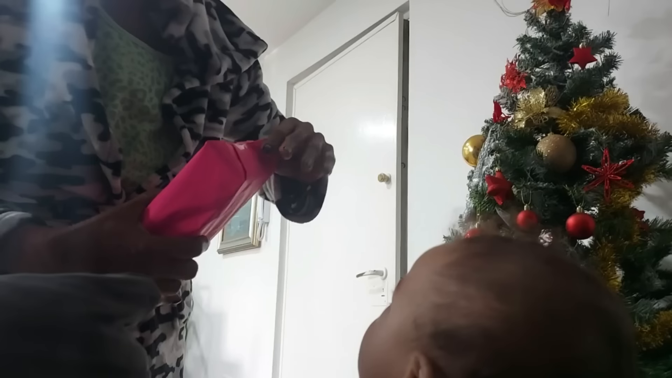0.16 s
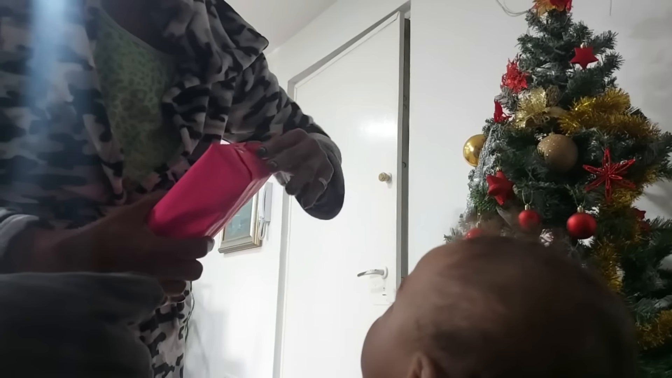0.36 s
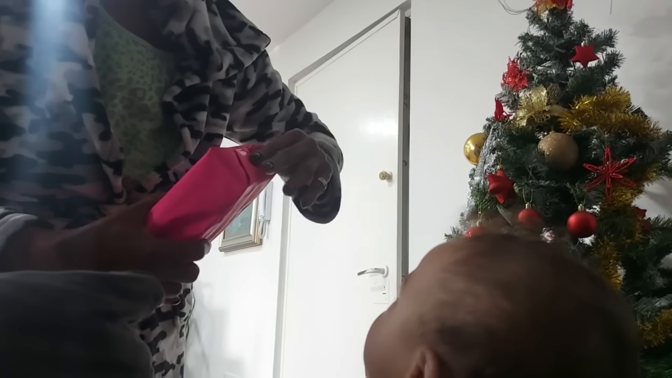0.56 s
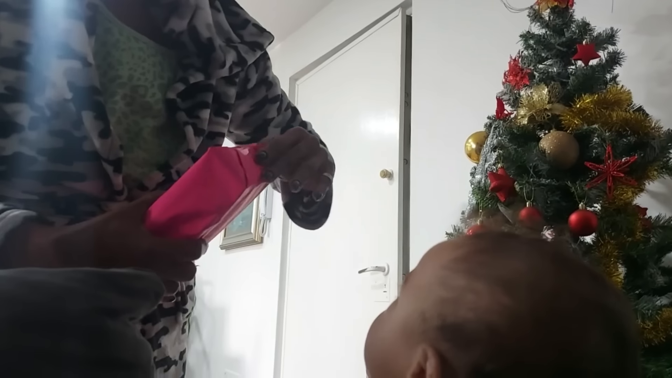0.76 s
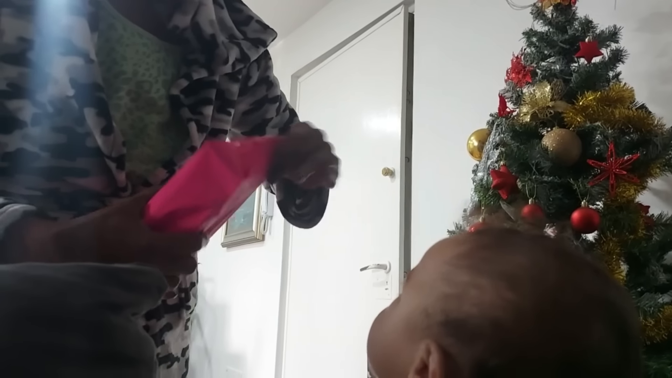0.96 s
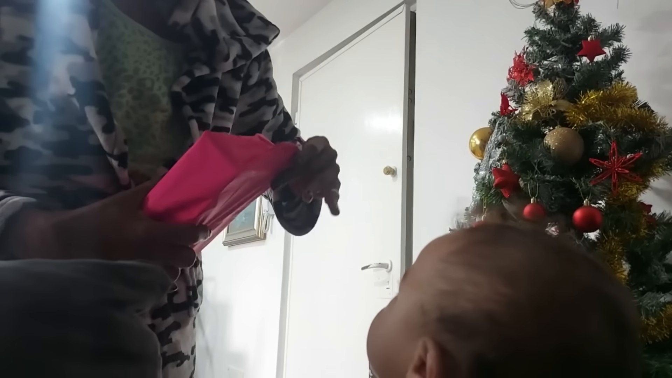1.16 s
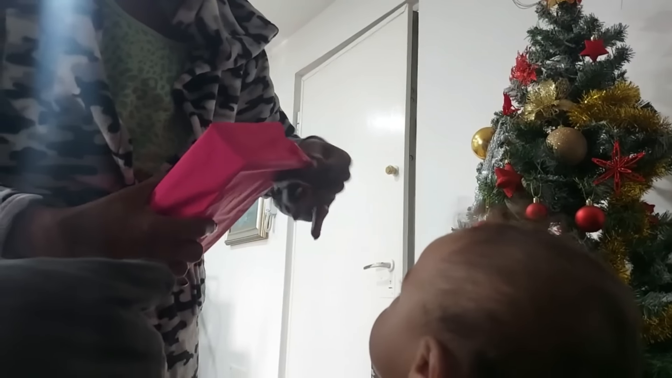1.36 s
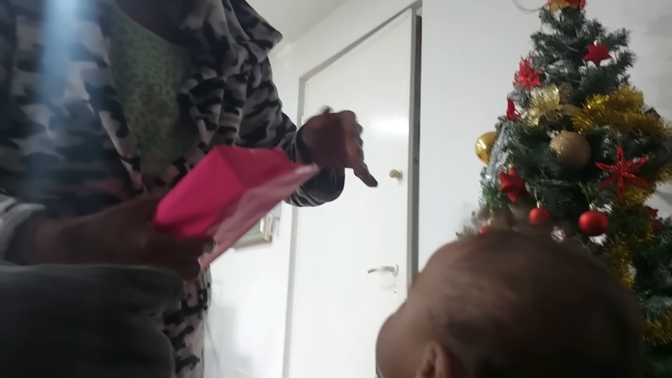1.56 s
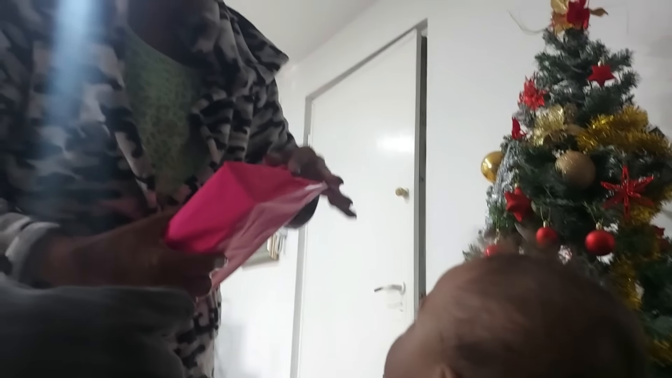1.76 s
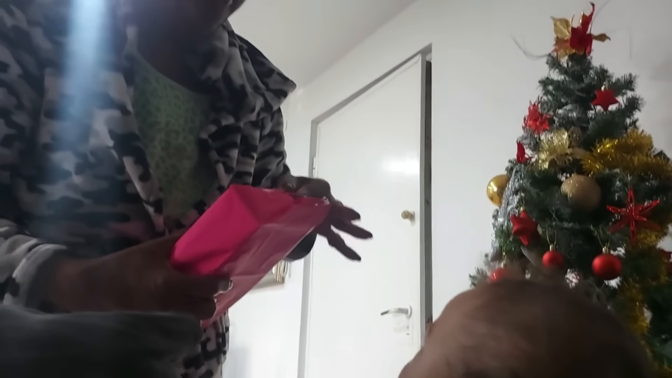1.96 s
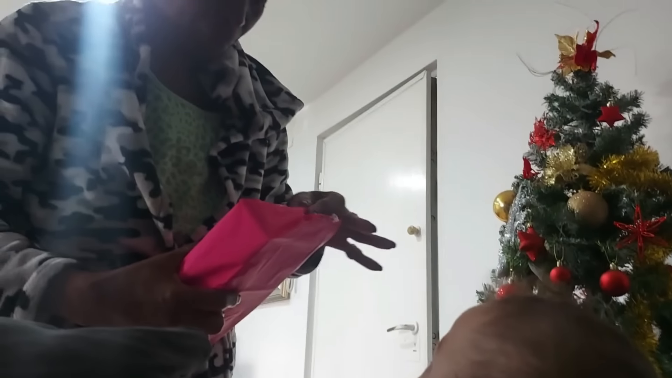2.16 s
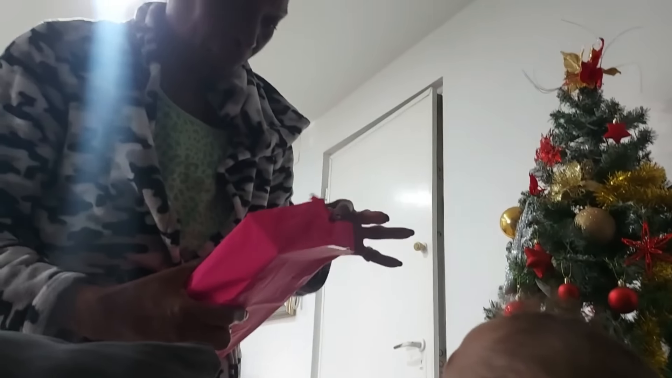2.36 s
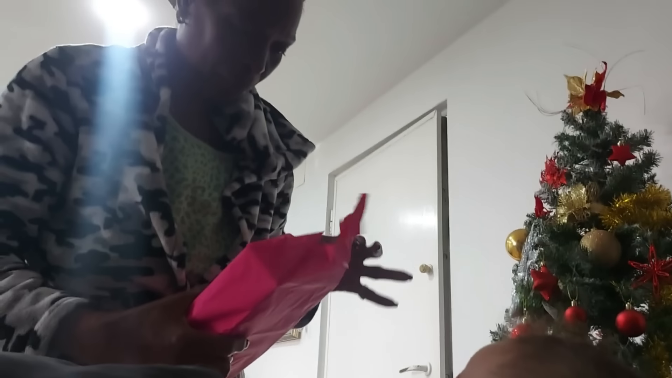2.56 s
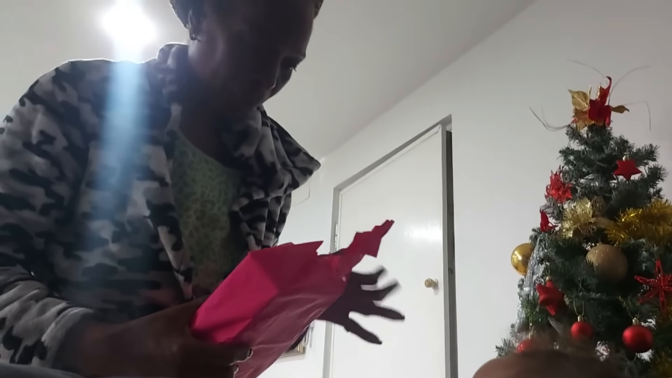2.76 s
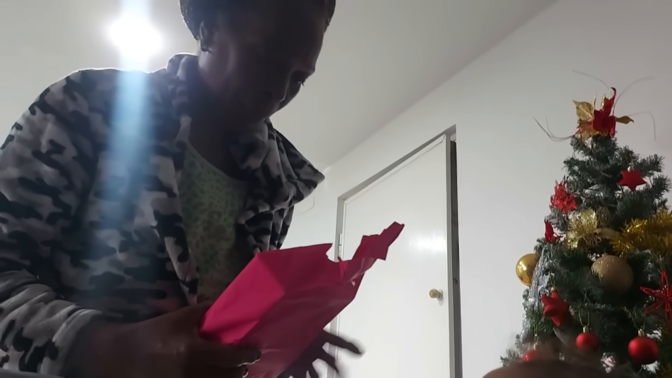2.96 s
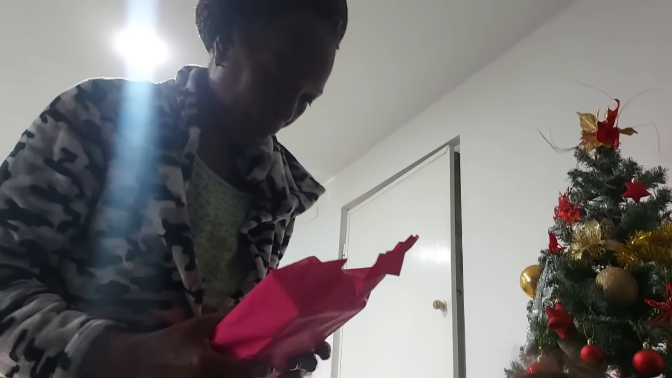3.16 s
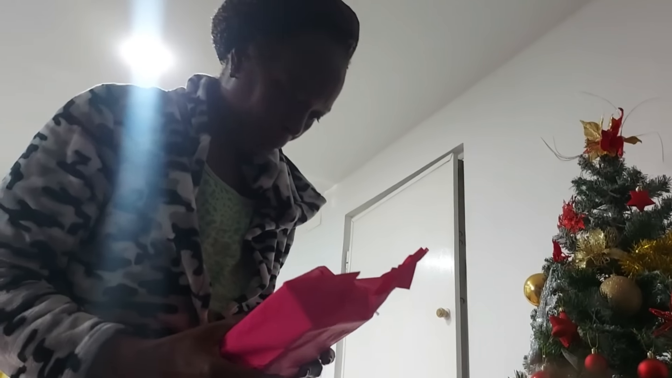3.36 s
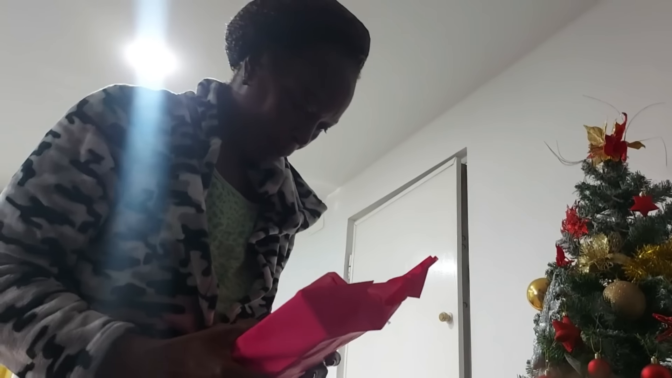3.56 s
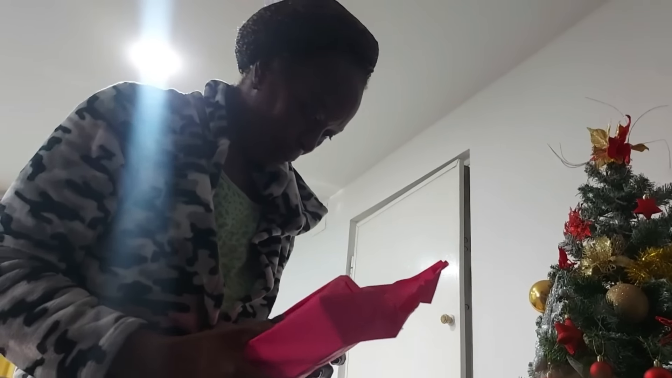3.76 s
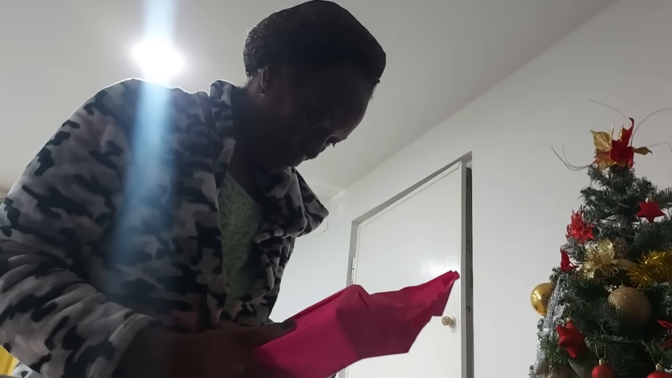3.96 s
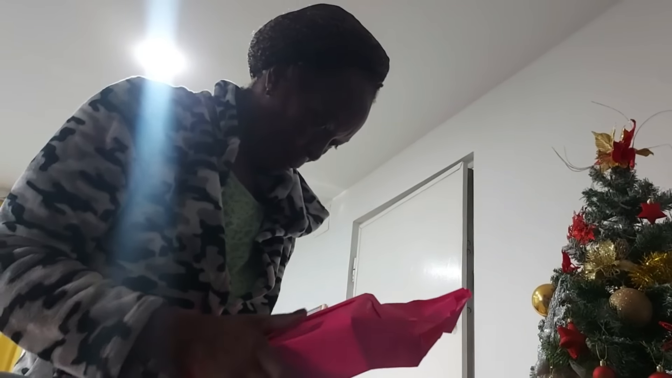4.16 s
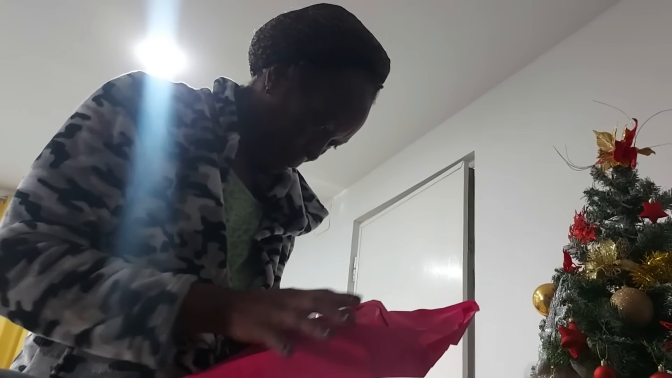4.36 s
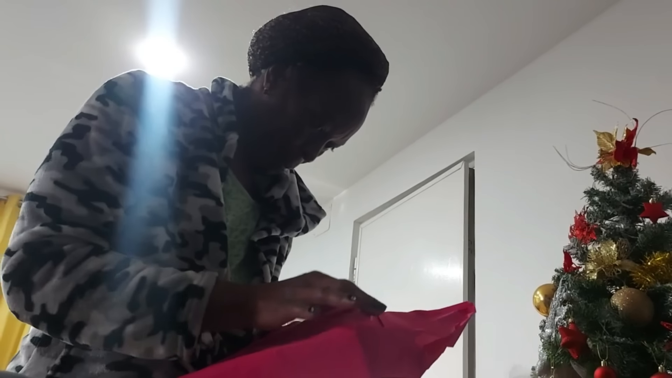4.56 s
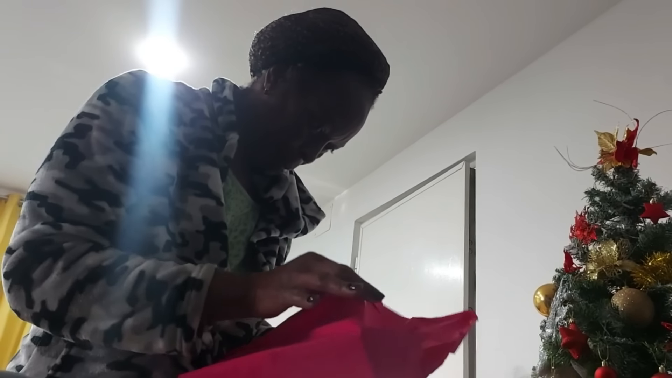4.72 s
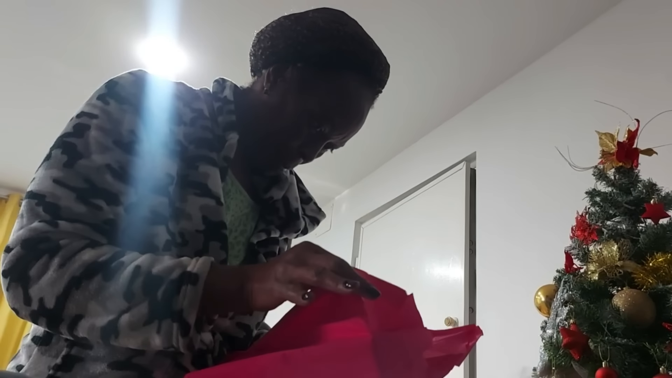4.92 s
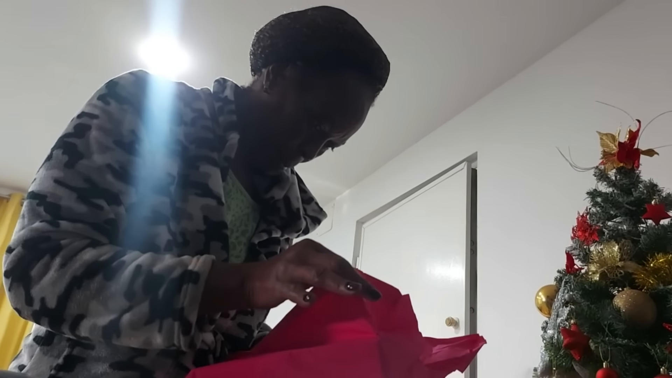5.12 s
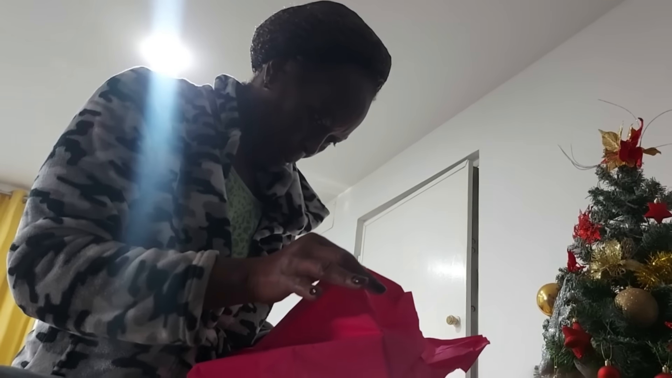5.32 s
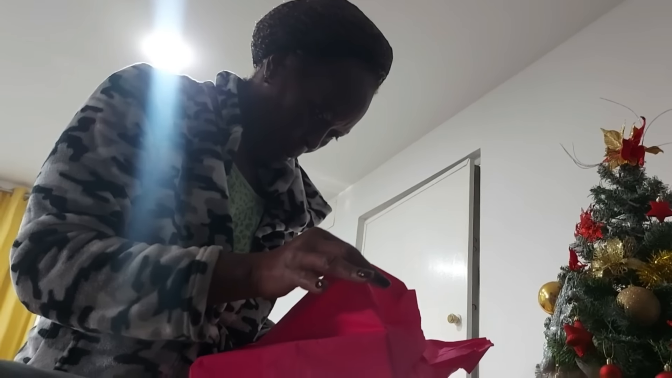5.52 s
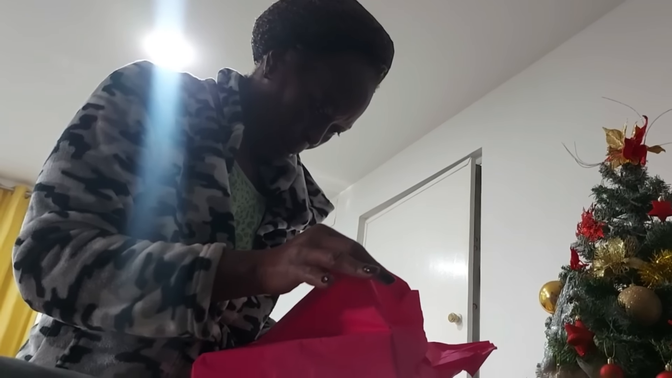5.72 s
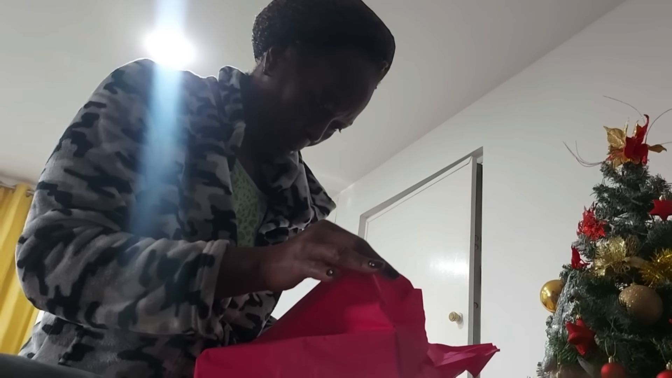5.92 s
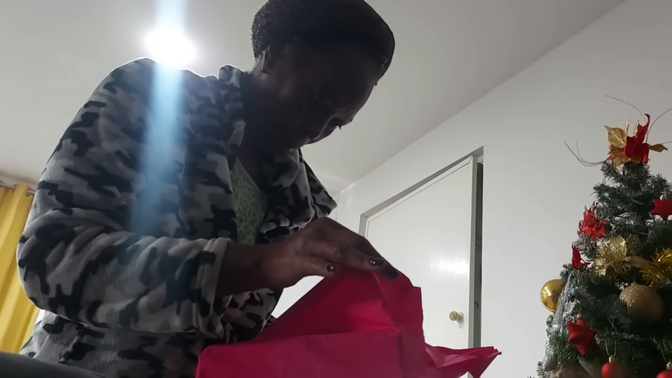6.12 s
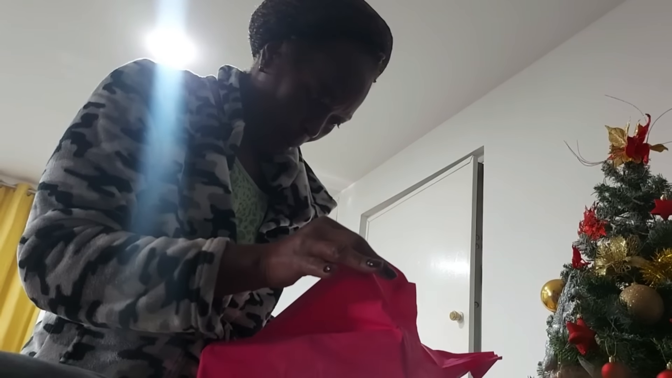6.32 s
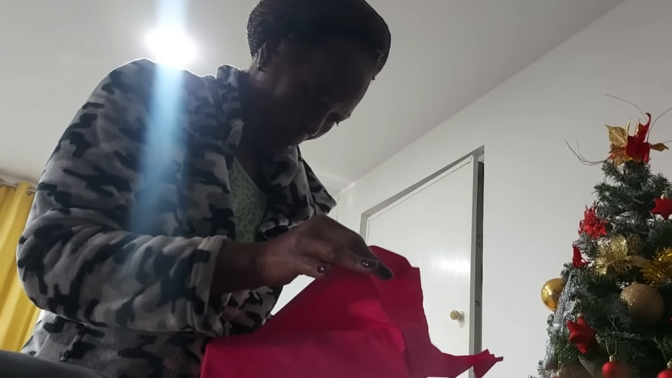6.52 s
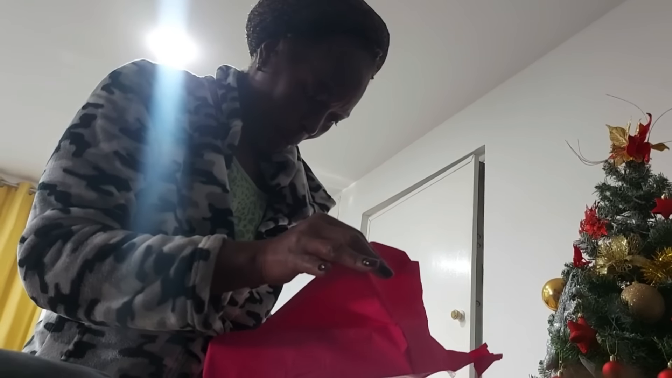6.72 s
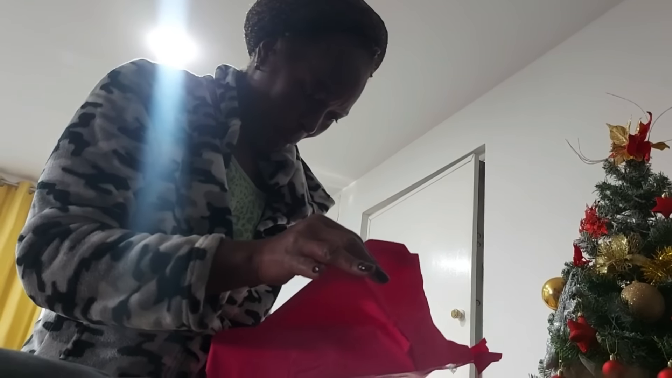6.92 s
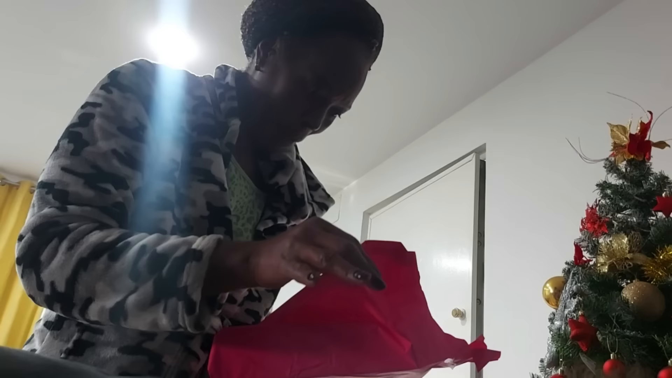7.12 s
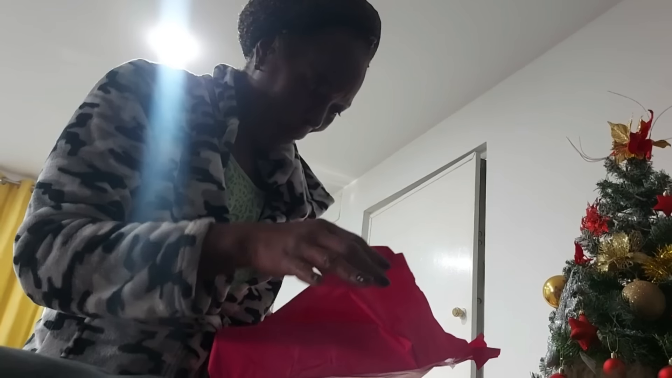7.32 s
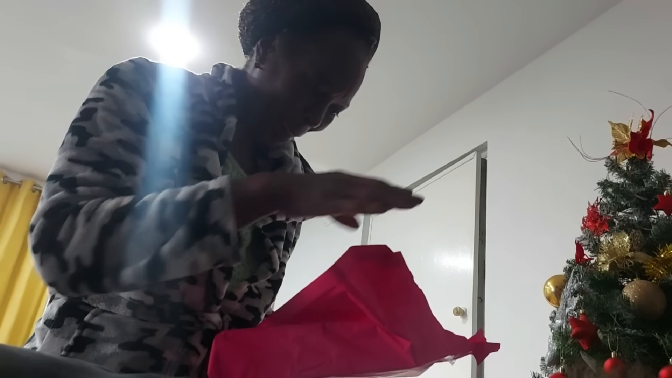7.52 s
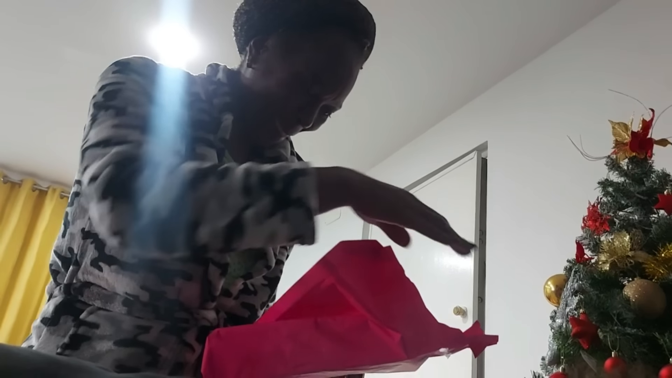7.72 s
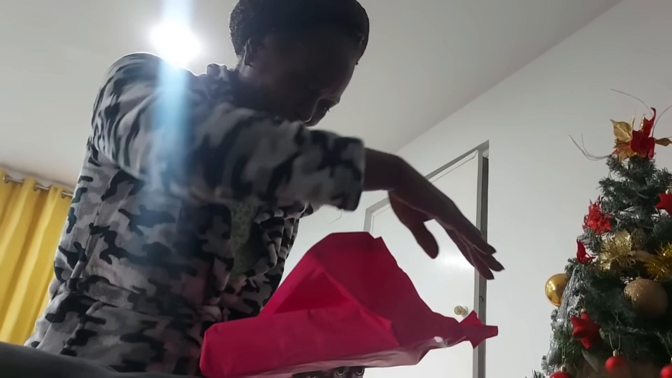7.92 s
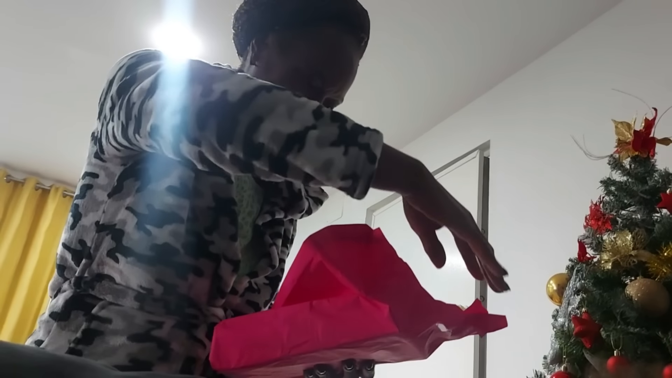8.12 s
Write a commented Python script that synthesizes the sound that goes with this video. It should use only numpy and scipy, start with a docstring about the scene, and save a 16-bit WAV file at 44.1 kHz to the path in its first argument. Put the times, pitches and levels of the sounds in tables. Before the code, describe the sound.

Hands open a paper-wrapped present close to the microphone in a quiet, slightly echoing living room. The paper crinkles in irregular bursts, with creases snapping sharply. A quick rip and a loud crunch come about a third of the way in. The rustling then turns softer and more broken, with short lulls and scattered crackles. Dull little bumps on the parcel come now and then over a faint low hum.

```python
"""In a bare, slightly echoing living room, a paper-wrapped present is opened by hand.
Each move of the hands bends the sheet: tiny facets buckle in a crackle and the paper slides, then settles.
Creases snap through with single sharp cracks, and one fold rips loose in a quick run of plucks.
Hands bump the parcel now and then with a damped thud, over a quiet room tone."""
import sys
import numpy as np
from scipy import signal
from scipy.fft import rfft, irfft
from scipy.io import wavfile
from scipy.ndimage import uniform_filter1d

SR = 44100
rng = np.random.default_rng(int(sys.argv[2]) if len(sys.argv) > 2 else 0)


def wrap_up_sound(samples):
    """Save the sound to the file named by the first command line argument, as 16-bit audio."""
    columns = np.atleast_2d(samples).T
    # keep every value between -1 and 1, then stretch to whole-number steps
    tamed = np.clip(columns, -1, 1)
    steps = np.round(tamed * 32767).astype(np.int16)
    wavfile.write(sys.argv[1], SR, steps)


N = 360826

# spectrum of the room's rumble and hiss: frequency_hz, density_db
ROOM_TONE_SPECTRUM = [(25, -18), (55, -7.5), (110, 1.5), (200, -13), (350, -6.5), (600, -20), (1200, -19.5),
                      (4000, -34), (8000, -23.5)]
# reverberation time of the room: frequency_hz, t60_s
REVERB_TIMES = [(120, 1.5), (380, 1.1), (600, 0.58), (7000, 0.43), (14000, 0.31)]
# likeness of the two channels in a diffuse field: frequency_hz, correlation
COHERENCE = [(350, 0.85), (700, 0.34), (1400, 0.11), (3000, 0.14)]
# soft contacts of hand and parcel: start_s, peak_db, pitch_hz
HAND_BUMPS = [(.342, -28.5, 690), (1.012, -39.5, 68), (2.47, -28, 346), (2.672, -33.5, 165),
              (2.697, -26.5, 336), (3.168, -40, 340), (3.605, -43, 325), (4.95, -40.5, 388),
              (5.135, -45, 360), (6.512, -40, 262), (6.889, -37, 128), (7.025, -36.5, 331),
              (7.865, -46.5, 196), (7.902, -35, 123), (7.925, -39.5, 270)]
# pulls and folds of the sheet: start_s, pull_s, settle_s, effort_db, tautness (slack < 0 < crisp)
HAND_MOVES = [(0.0, 0.0011, 0.028, -35, 1.5), (0.249, 0.099, 0.047, -38.5, 1),
              (0.488, 0.015, 0.44, -48, 1.13), (0.632, 0.17, 0.082, -38.5, 0.5),
              (1.009, 0.0079, 0.28, -33, 0.23), (1.2, 0.16, 0.16, -40.5, -0.5),
              (1.42, 0.063, 0.044, -40.5, 0.5), (1.784, 0.014, 1, -61.5, 0.5),
              (2.141, 0.098, 0.031, -40, 0.16), (2.254, 0.13, 0.33, -32.5, 0.1),
              (2.633, 0.046, 0.073, -24, -0.17), (2.75, 0.0306, 0.066, -36.5, 1),
              (3.029, 0.16, 0.032, -50.5, 1), (3.233, 0.017, 0.31, -44.5, -0.5),
              (3.449, 0.17, 0.22, -42, -2), (3.735, 0.016, 0.51, -43.5, 0.07), (4.19, 0.026, 0.1, -59, 3),
              (4.552, 0.047, 0.22, -58.5, 2.5), (4.619, 0.029, 0.18, -41.5, 1.46),
              (4.709, 0.088, 0.073, -40.5, 0.1), (4.849, 0.061, 0.24, -49, -1.6),
              (5.85, 0.26, 0.14, -62.5, -3.5), (6.292, 0.071, 0.19, -50.5, -1),
              (6.47, 0.047, 0.055, -48, -4), (6.728, 0.044, 0.16, -47, -2.5),
              (6.882, 0.025, 0.015, -32, -1), (7.02, 0.063, 0.18, -52, -1),
              (7.209, 0.15, 0.075, -57.5, 1.5)]
# spectrum of the crumpling sheet: frequency_hz, density_db
SHEET_SPECTRUM = [(200, -13.5), (360, 2), (500, -8), (790, 2.5), (1150, -3), (2300, 0), (4000, 0),
                  (7300, -3.5), (9500, -9.5), (12000, -5), (16000, -17.5)]
# spectrum of one snapping crease: frequency_hz, density_db
CREASE_SPECTRUM = [(350, -18.5), (800, -8), (1900, -6.5), (2650, 2.5), (3400, -2.5), (4500, 0.5),
                   (7500, -1), (9300, -9), (12000, -2), (16000, -16.5)]
# creases that buckle, levels relative to one another: start_s, level_db, pitch_hz, treble_db
CREASE_SNAPS = [(.049, -22, 4740, -5.5), (0.218, -35.5, 4240, -12), (.249, -26.5, 4540, 2),
                (.32, -24.5, 4300, -20.5), (0.507, -28.5, 4540, 29.5), (.651, -22, 6300, 6.5),
                (0.735, -25.5, 3800, 12.5), (.790, -20.5, 5310, -5), (.898, -27.5, 6300, 10),
                (1.014, -10.5, 3710, 2.5), (1.262, -30.5, 3900, 1), (1.310, -26.5, 6550, 28),
                (1.350, -25.5, 5330, -1.5), (1.438, -28.5, 4970, 3), (1.589, -39, 4200, -2),
                (1.803, -46.5, 4500, 5), (2.045, -42, 4300, -2), (2.138, -30, 4070, 10.5),
                (2.207, -28.5, 2920, 8), (2.426, -11.5, 2720, -6), (2.463, -12, 5560, -4),
                (2.618, -25, 4300, -3), (2.651, -22.5, 7480, 5), (2.659, -23, 4500, 8),
                (2.678, -17, 3000, 10), (2.796, -23.5, 4120, 3), (2.835, -31.5, 2444, -29),
                (3.08, -32.5, 6900, 9), (3.163, -29.5, 4240, 2), (3.243, -35, 5800, -3.5),
                (3.254, -31, 5430, 9), (3.391, -27.5, 4900, -5.5), (3.491, -27, 4900, -14),
                (3.538, -28.5, 4870, -13), (3.599, -30.5, 4500, -5), (3.622, -23, 4900, 4),
                (3.727, -27.5, 4420, 14), (3.749, -25.5, 6810, -4), (3.763, -22.5, 4500, 8),
                (4.036, -38.5, 4420, -9), (4.237, -38, 5670, -8), (4.375, -41, 7500, 0),
                (4.784, -26.5, 7440, 5), (4.795, -27, 2320, -33), (4.952, -38, 1450, -12),
                (5.146, -39, 4530, -9), (5.199, -43.5, 2540, -19), (5.793, -35, 2660, -14.5),
                (6.222, -37, 6640, -1), (6.299, -25.5, 4220, -3), (6.477, -25.5, 3520, -5),
                (6.487, -26, 3800, -5), (6.499, -32, 4000, -23), (6.563, -31.5, 3900, -18),
                (6.603, -27.5, 4250, -9), (6.604, -30, 2740, -17), (6.708, -43, 2800, -33),
                (6.785, -39, 3700, -18), (6.868, -25.5, 2450, -5.5), (6.895, -26, 4500, 0),
                (7.028, -34, 1430, -11), (7.055, -35, 4830, -13), (7.471, -45, 6860, 13),
                (7.657, -54.5, 2700, -10.5)]


def from_db(db):
    """Amplitude ratio of a level in decibels."""
    return 10 ** (np.asarray(db) / 20)


def unit_rms(x):
    """Normalisation to unit mean power."""
    return x / np.sqrt(np.mean(x ** 2) + 1e-20)


def at_hz(points, hz):
    """Interpolation of a table on a log-frequency axis."""
    known_hz, values = np.transpose(points)
    return np.interp(np.log(hz + 1), np.log(known_hz), values)


def drift(per_s):
    """Random modulation: straight lines between Gaussian values."""
    knots = rng.standard_normal(int(N / SR * per_s) + 2)
    return np.interp(np.arange(N) / SR * per_s, np.arange(len(knots)), knots)


def filtered(x, hz, kind, order=2):
    """Butterworth filtering, maximally flat in the passband."""
    return signal.sosfilt(signal.butter(order, hz, kind, fs=SR, output="sos"), x)


def add(out, start_s, sound):
    """Superposition of a stereo sound on the mix."""
    at = int(np.clip(start_s * SR, 0, N - 1))
    out[:, at:at + sound.shape[1]] += sound[:, :N - at]


def diffuse_noise(size, min_correlation=-1):
    """Diffuse-field coherence: the channels agree most in the bass. Returns frequencies and spectra."""
    hz = np.linspace(0, SR / 2, size // 2 + 1)
    correlation = np.clip(at_hz(COHERENCE, hz), min_correlation, 1)
    mid, side = rfft(rng.standard_normal((2, size)))
    return hz, np.sqrt(1 + correlation) * mid + np.sqrt(1 - correlation) * side * [[1], [-1]]


def coloured_noise(spectrum):
    """Spectral shaping of steady diffuse noise, at unit power."""
    hz, noise = diffuse_noise(N)
    return unit_rms(irfft(noise * from_db(at_hz(spectrum, hz))))


def room_tone(level_db=-61.5):
    """Stationary background noise: the low rumble of the house and a faint hiss."""
    return from_db(level_db) * coloured_noise(ROOM_TONE_SPECTRUM)


def reverberation(x, onset_s=0.0036, echo_s=0.0039, echo_db=-4.5, size=44100):
    """Early reflection from a near surface, then exponential decay between plaster walls, treble first."""
    t = np.arange(size) / SR
    hz, noise = diffuse_noise(size)
    tail = 0
    for band_hz, t60_s in REVERB_TIMES:
        band = at_hz([(row_hz, row_hz == band_hz) for row_hz, _ in REVERB_TIMES], hz)
        tail = tail + irfft(noise * band) * from_db(-60 * t / t60_s)
    tail *= np.clip(t / onset_s - 1, 0, 1)
    echo = rng.standard_normal((2, size)) * (t > echo_s) * np.exp(-np.abs(t - echo_s) / 0.0011)
    response = (unit_rms(tail) + from_db(echo_db) * unit_rms(echo)) / np.sqrt(size)
    return signal.oaconvolve(x, response, axes=1)[:, :N]


def bumps(decay_s=0.02, size=8192):
    """Damped impact: each soft contact with the parcel gives a short, hollow thud."""
    out, t = np.zeros((2, N)), np.arange(size) / SR
    for start_s, peak_db, pitch_hz in HAND_BUMPS:
        _, noise = diffuse_noise(size)
        push = irfft(noise) * np.exp(-t / decay_s)
        thud = filtered(push, pitch_hz * np.array([0.8, 1.7]), "band")
        add(out, start_s, from_db(peak_db) * thud / np.abs(thud).max())
    return out


def buckle(spectrum, flap_hz, flap_db, treble_db, decay_s, flap_octaves=0.15, size=1024):
    """Buckling: a facet flips in a noise burst of unit energy, lifted around its flap's resonance."""
    t = np.arange(size) / SR
    hz, noise = diffuse_noise(size, min_correlation=0.05)
    burst = irfft(noise) * np.exp(-(t / decay_s) ** 2) * (1 - np.exp(-t / 0.000099))
    resonance_db = flap_db * np.exp(-0.5 * (np.log2((hz + 1) / flap_hz) / flap_octaves) ** 2)
    shelf_db = treble_db / (1 + (7200 / (hz + 1)) ** 6)
    colour = from_db(at_hz(spectrum, hz) + resonance_db + shelf_db)
    travel_s = np.array([[0.001], [0.00113]])  # arrives a little sooner on the left
    crack = irfft(rfft(burst) * colour * np.exp(-2j * np.pi * hz * travel_s))
    return crack / np.sqrt(np.sum(crack ** 2) / 2)


def flap_ring(pitch_hz, decay_s=0.0016, size=1024):
    """Free vibration: a flap swings a few times before the air damps it; unit energy."""
    t = np.arange(size) / SR
    swing = np.sin(2 * np.pi * (pitch_hz * t + rng.random((2, 1))))
    envelope = np.exp(-(t / decay_s) ** 2) * (1 - np.exp(-t / 0.00044))
    return unit_rms(swing * envelope) / np.sqrt(size)


def handling(hold_db=-73.5, settle_db=20, pull_curve=0.7, settle_curve=1.35):
    """Power summation of moves that build, then relax. Returns effort in dB and weighted tautness."""
    t = np.arange(N) / SR
    power = np.full(N, from_db(hold_db) ** 2)  # paper that is only held still slides faintly
    weighted_tautness = 0
    for start_s, pull_s, settle_s, effort_db, tautness in HAND_MOVES:
        pull = np.clip((t - start_s) / pull_s, 0, 1) ** pull_curve
        settled = np.clip((t - start_s - pull_s) / settle_s, 0, 10) ** settle_curve
        move_power = (pull * from_db(effort_db - settle_db * settled)) ** 2
        power += move_power
        weighted_tautness += tautness * move_power
    return 10 * np.log10(power), weighted_tautness / power


def crackle(effort_db, peak_per_s=650, spread_db=3.5, threshold_db=-64.0, pitches=16):
    """Shot noise: tiny facets flip at random, more often under more effort."""
    rate_per_s = peak_per_s * from_db(0.45 * (effort_db - np.max(effort_db)))
    flips = (rng.random(N) < rate_per_s / SR) * from_db(spread_db * np.minimum(rng.exponential(1, N), 3.5))
    local_power = np.abs(uniform_filter1d(flips ** 2, size=2205))
    flips /= np.sqrt(local_power + 0.0016)  # evened out, so that effort sets the level
    # below the buckling threshold the flips die out
    flips *= from_db(effort_db + np.minimum(effort_db - threshold_db, 0))
    facet, out = rng.integers(0, pitches, N), 0
    for k, flap_hz in enumerate(np.geomspace(1900, 13000, pitches)):
        crack = buckle(SHEET_SPECTRUM, flap_hz, flap_db=9.5, treble_db=0, decay_s=0.0021)
        out += signal.oaconvolve((flips * (facet == k))[None], crack, axes=1)[:, :N]
    return out


def rustle(slide_db=-4.5, clump_db=3.5, treble_db_per_taut=5.5, bass_db_per_taut=-3.0):
    """Friction and buckling: the sheet slides and crackles, bright when taut and dull when slack."""
    effort_db, tautness = handling()
    facets = crackle(effort_db)
    slide = coloured_noise(SHEET_SPECTRUM) * from_db(effort_db + slide_db)
    sheet = (facets + slide) * from_db(clump_db * drift(per_s=90))
    bass_change = filtered(sheet, 870, "low", order=1) * (from_db(bass_db_per_taut * tautness) - 1)
    treble_change = filtered(sheet, 7000, "high", order=1) * (from_db(treble_db_per_taut * tautness) - 1)
    return sheet + bass_change + treble_change


def rip(start_s=2.412, length_s=0.05, pluck_db=-2.0, flap_hz=2750, pitch_spread=0.22, fibres=14):
    """Fracture: a taped fold tears loose as fibres part in an uneven run, each plucking a stiff flap."""
    out = np.zeros((2, N))
    for k in range(fibres):
        pluck = flap_ring(flap_hz * np.exp(pitch_spread * rng.standard_normal()))
        add(out, start_s + length_s * (k + rng.random()) / fibres, from_db(pluck_db) * pluck)
    return out


def snaps(gain_db=21.0, ring_db=-3.5, brighten_db=4.0, tick_db=-13.0, tick_lead_s=0.018, crack_s=0.0031):
    """Snap-through: a loaded crease ticks, then cracks and rings. Returns direct and scattered sound."""
    direct, scattered = np.zeros((2, 2, N))
    for start_s, level_db, pitch_hz, treble_db in CREASE_SNAPS:
        shelf_db = treble_db + brighten_db
        pan_db = rng.normal(0, 1.2) * np.array([[1], [-1]])
        strength = from_db(level_db + gain_db + pan_db)
        crack = buckle(CREASE_SPECTRUM, pitch_hz, flap_db=6.0, treble_db=shelf_db, decay_s=crack_s)
        add(direct, start_s - 0.001, strength * crack)  # early by its travel time
        # the tick stays faint, even before the hardest snaps
        tick = from_db(min(level_db, -27) + gain_db + tick_db) * crack
        add(direct, start_s - tick_lead_s * (0.5 + rng.random()), tick)
        # tight, bright creases have little flap to ring
        ring = from_db(ring_db - 0.333 * max(shelf_db, 0)) * flap_ring(pitch_hz)
        add(direct, start_s, strength * ring)
        # directivity: a flap beams its pitch, so the walls get only the broad crack
        broad = buckle(CREASE_SPECTRUM, pitch_hz, flap_db=0, treble_db=shelf_db, decay_s=crack_s)
        add(scattered, start_s, strength * broad)
    return direct, scattered


def scene(snap_send_db=-7.5, sheet_send_db=-7.0, bump_send_db=-12.5, balance_db=0.5):
    """Direct and reverberant fields add: close paper, a little louder on the right, and the room behind."""
    cracks, scattered = snaps()
    sheet = rustle() + rip()
    thuds = bumps()
    to_walls = from_db(snap_send_db) * scattered + from_db(sheet_send_db) * sheet
    walls = reverberation(to_walls + from_db(bump_send_db) * thuds)
    balance = from_db(balance_db * np.array([[-1], [1]]))
    return (cracks + sheet + walls) * balance + thuds + room_tone()


def record(dry, cutoff_hz=16000):
    """Clipping and band limiting: the loudest snaps overload, and a steep low-pass cuts the top."""
    low_pass = signal.ellip(10, 0.1, 70, cutoff_hz, fs=SR, output="sos")
    return signal.sosfilt(low_pass, np.clip(dry, -1, 1))


dry = scene()
out = record(dry)
wrap_up_sound(out)
```